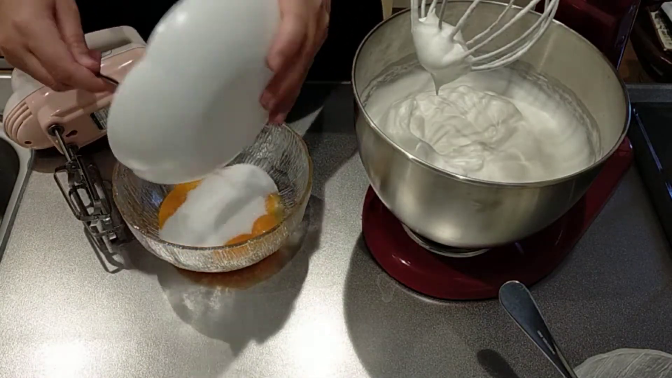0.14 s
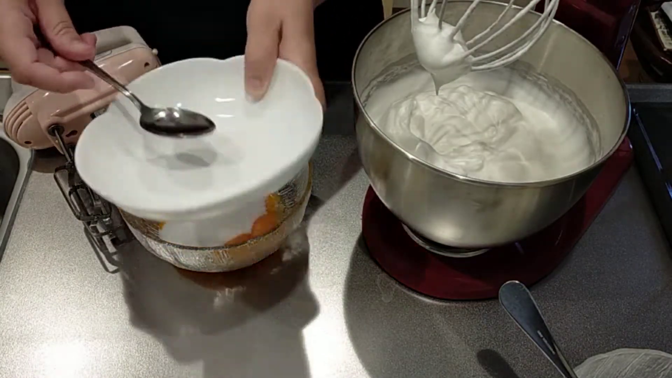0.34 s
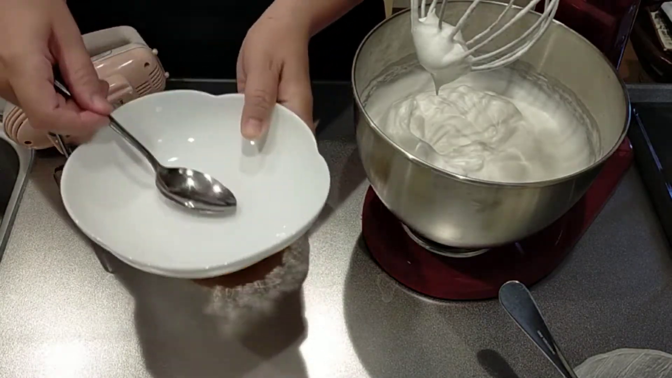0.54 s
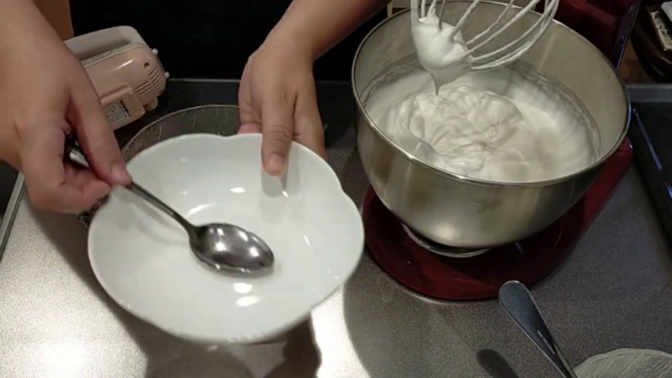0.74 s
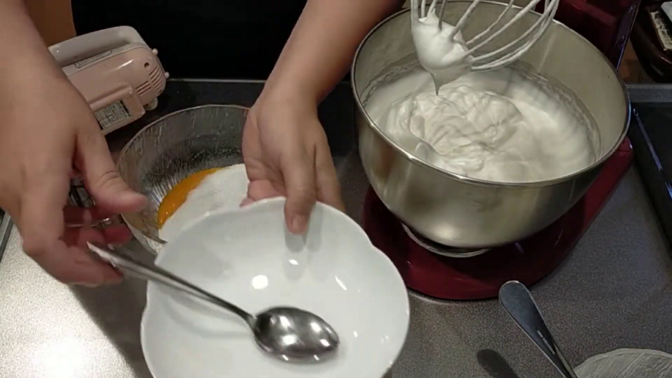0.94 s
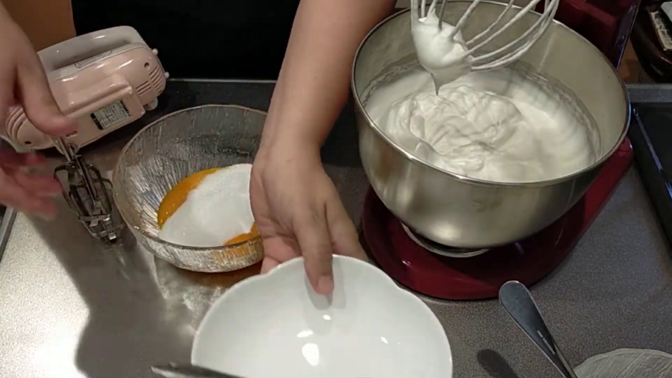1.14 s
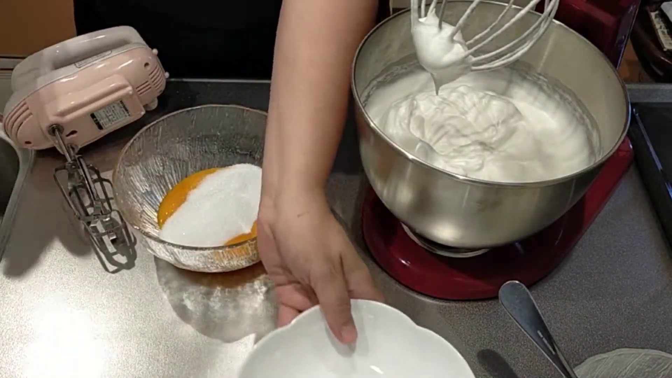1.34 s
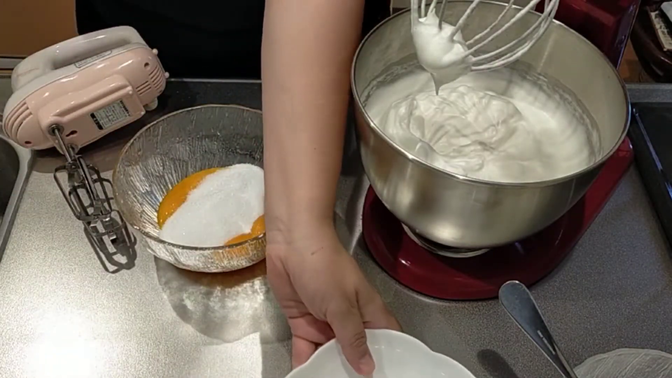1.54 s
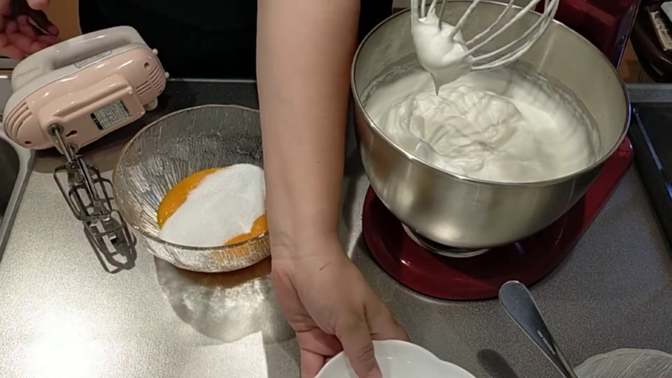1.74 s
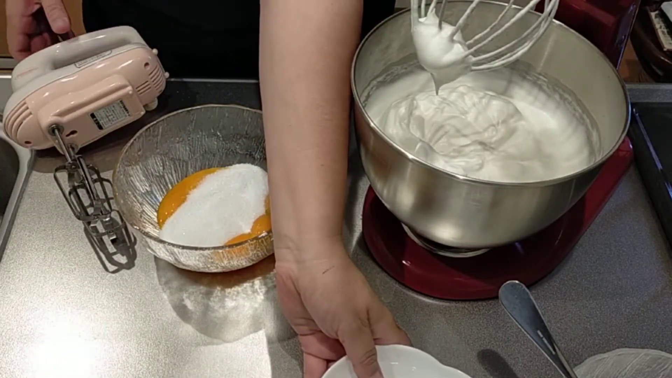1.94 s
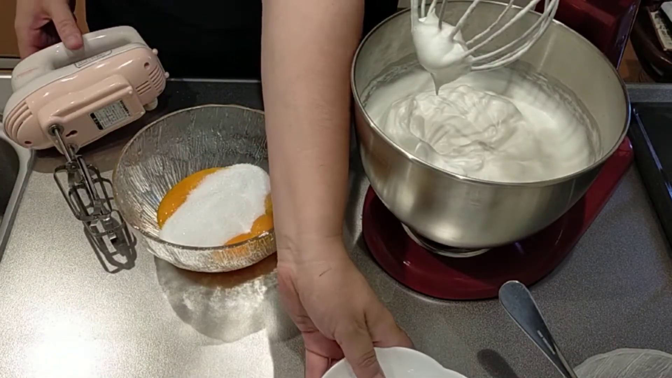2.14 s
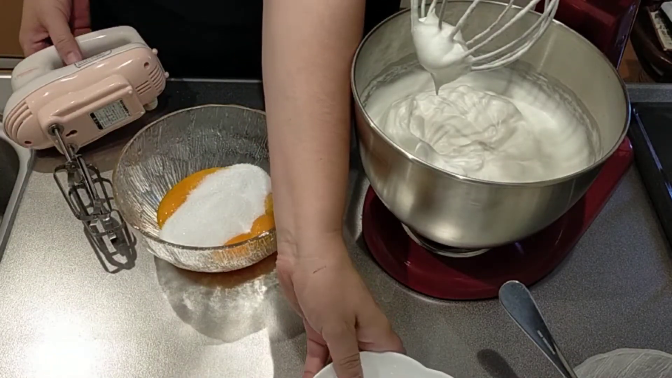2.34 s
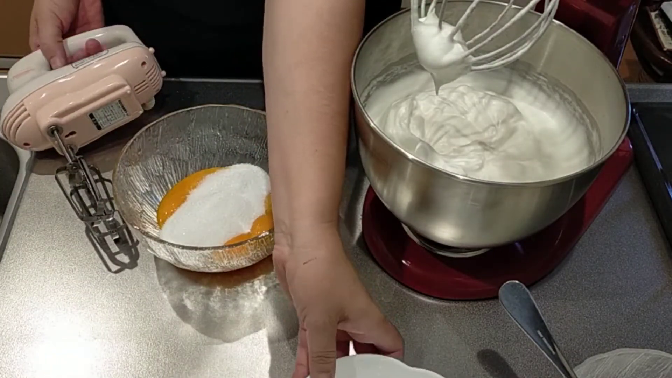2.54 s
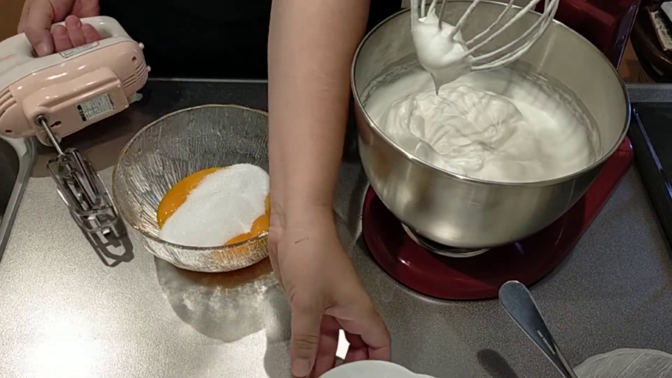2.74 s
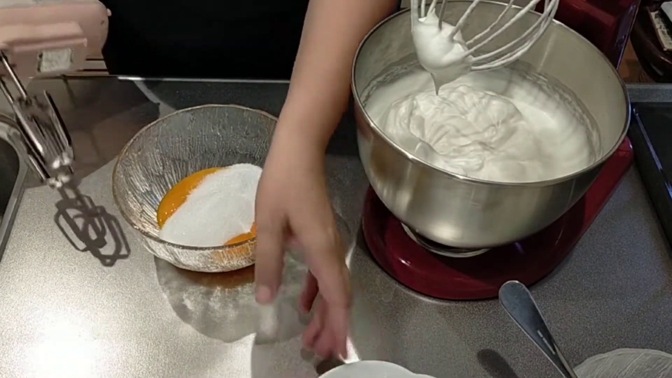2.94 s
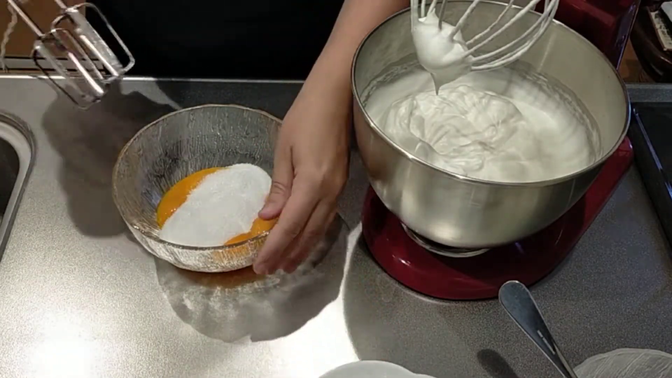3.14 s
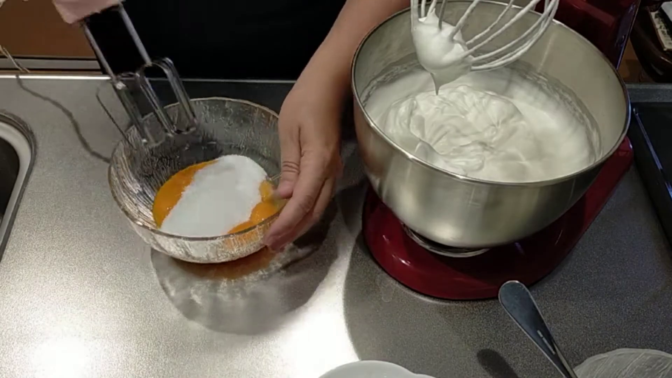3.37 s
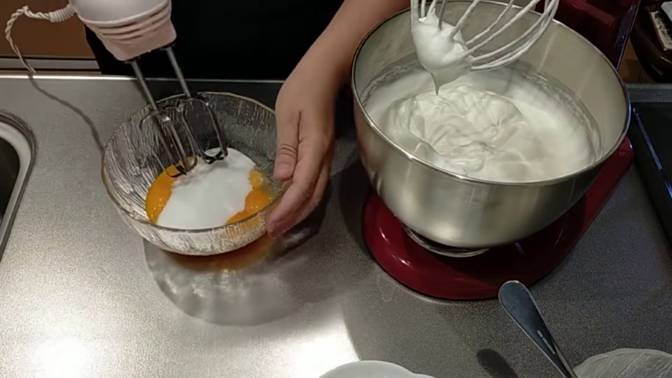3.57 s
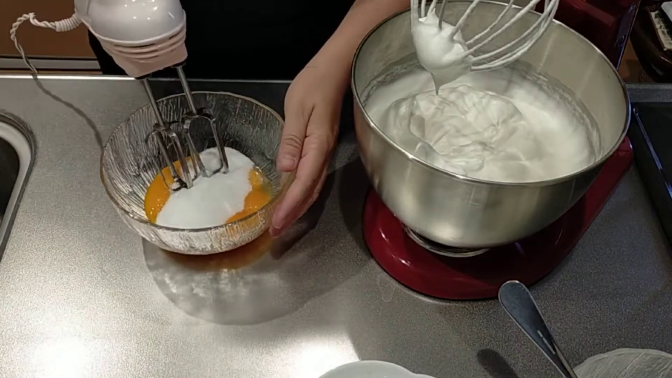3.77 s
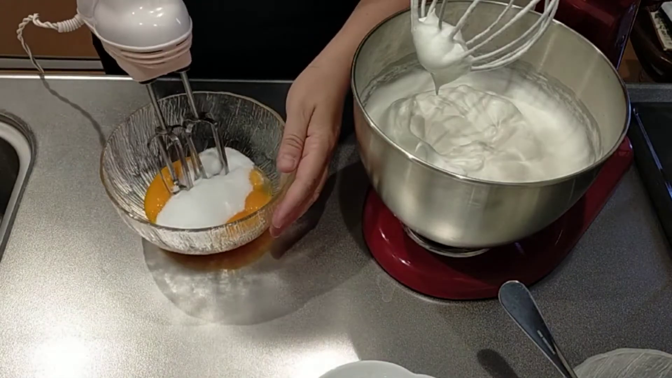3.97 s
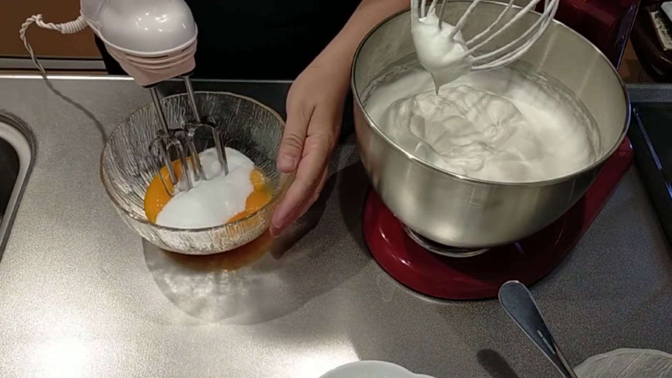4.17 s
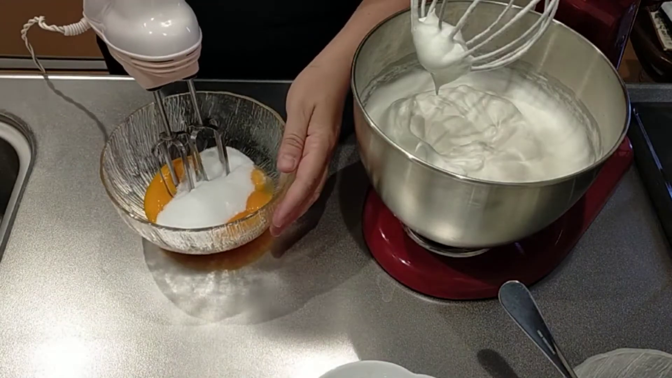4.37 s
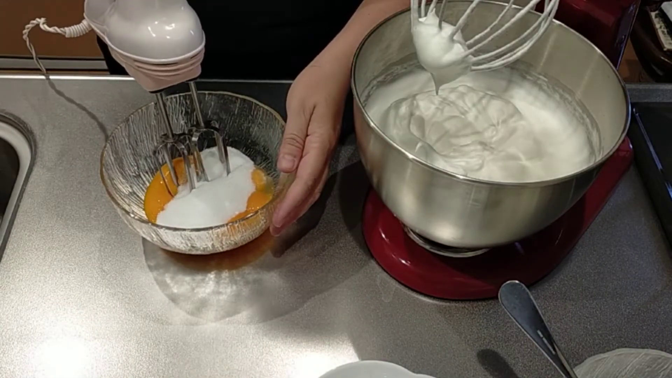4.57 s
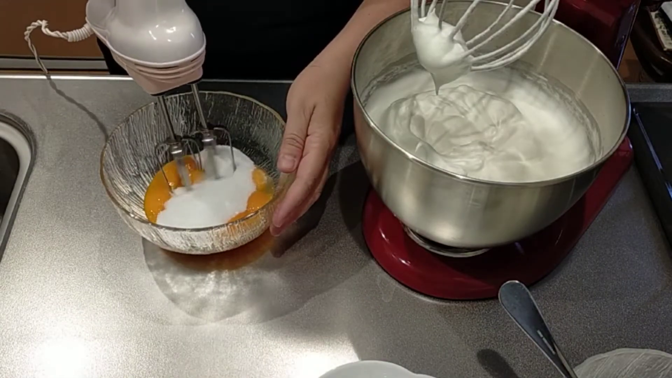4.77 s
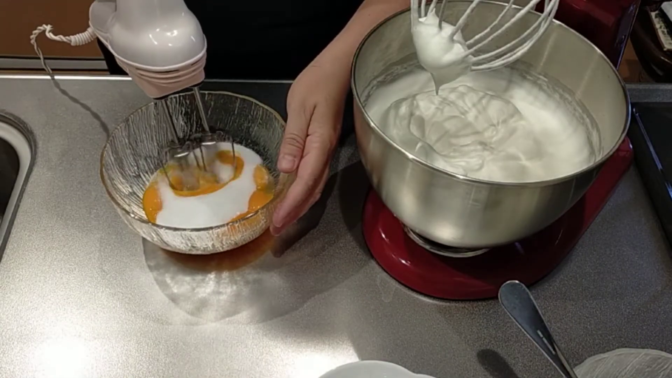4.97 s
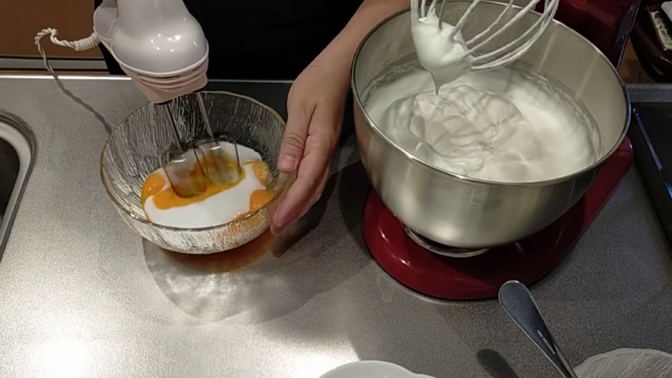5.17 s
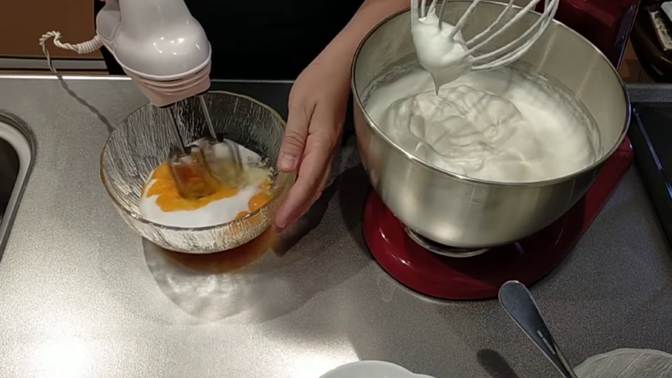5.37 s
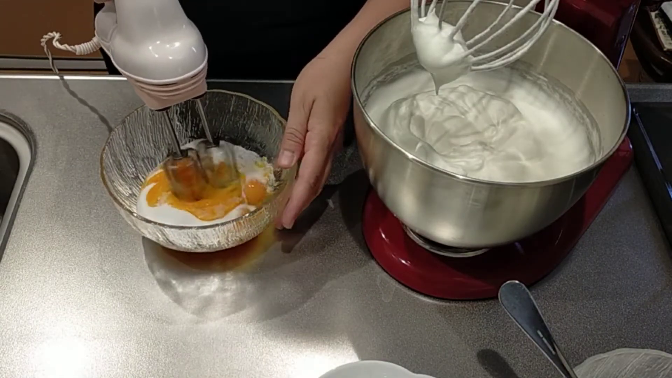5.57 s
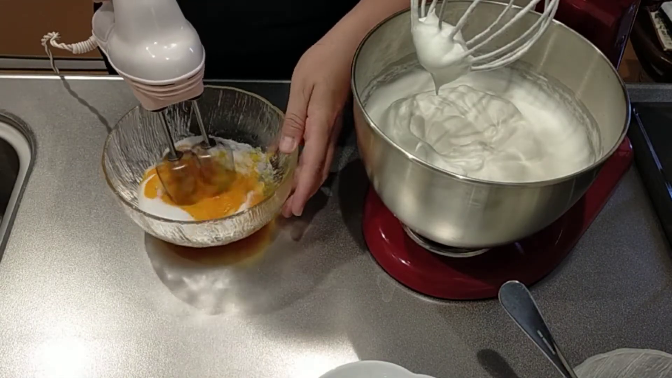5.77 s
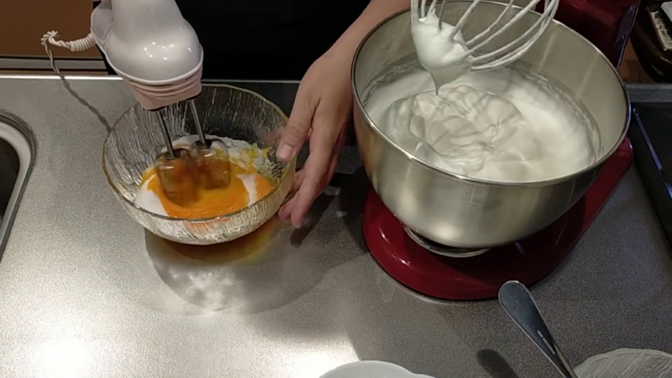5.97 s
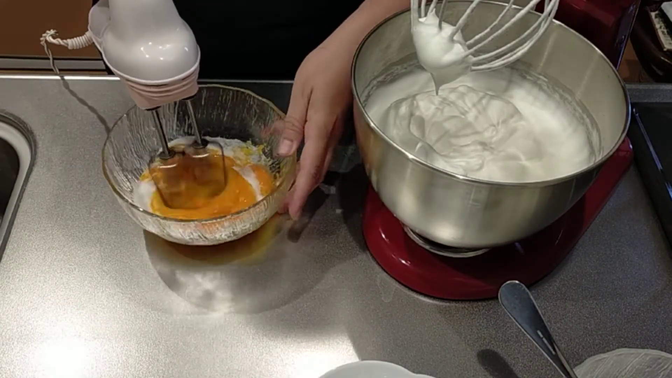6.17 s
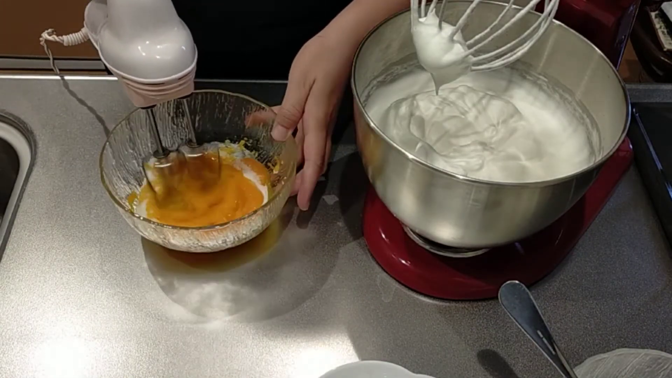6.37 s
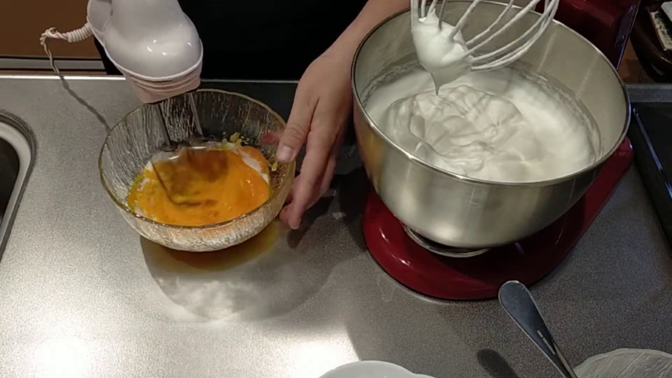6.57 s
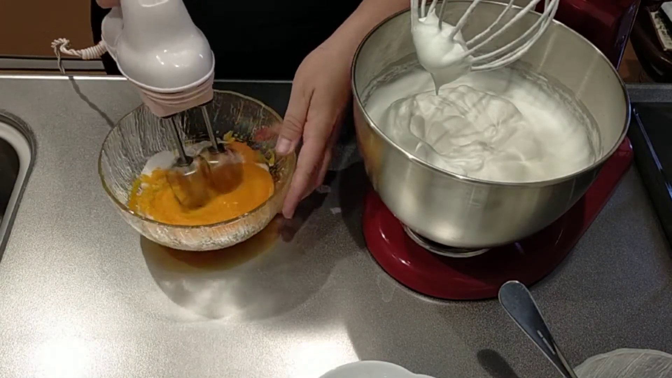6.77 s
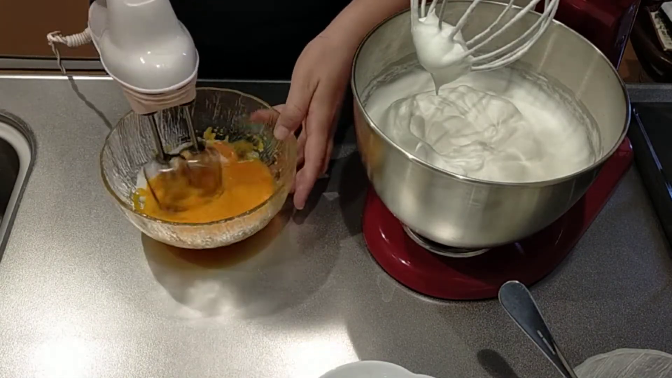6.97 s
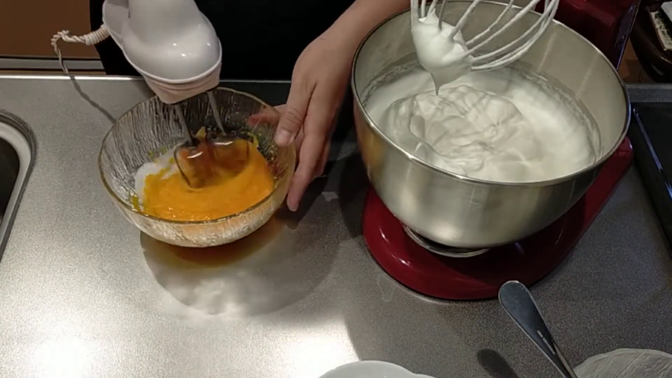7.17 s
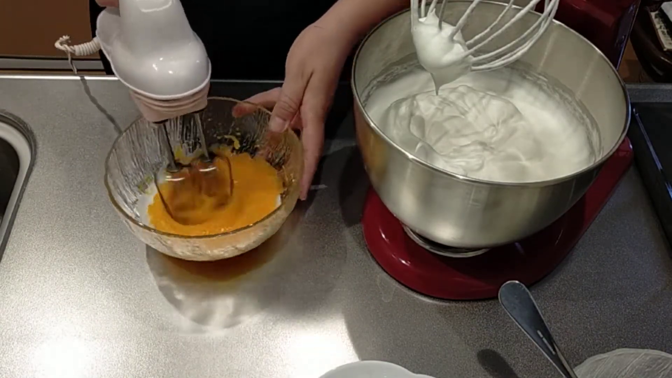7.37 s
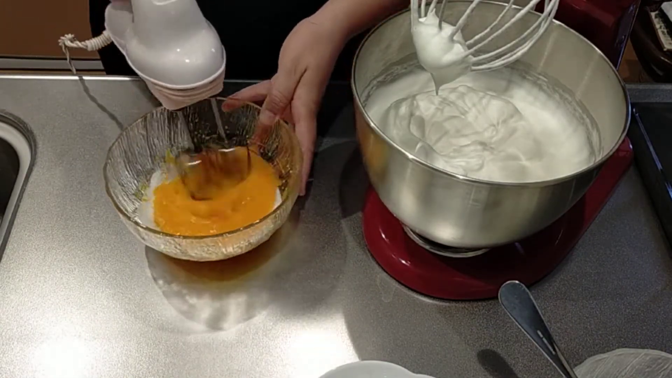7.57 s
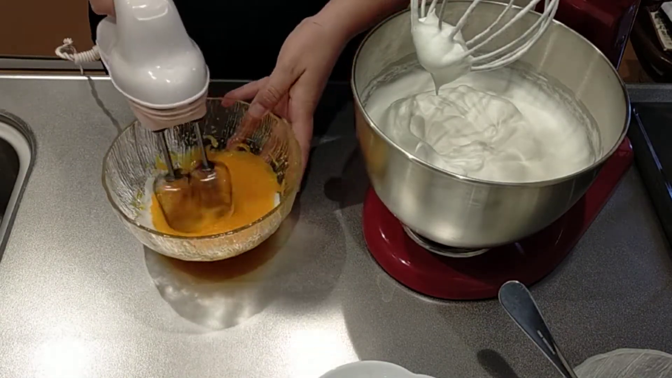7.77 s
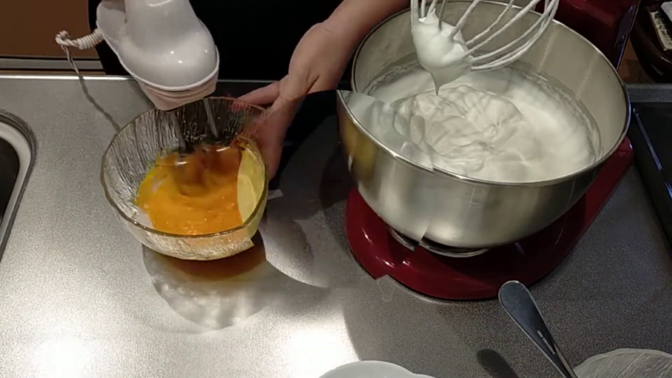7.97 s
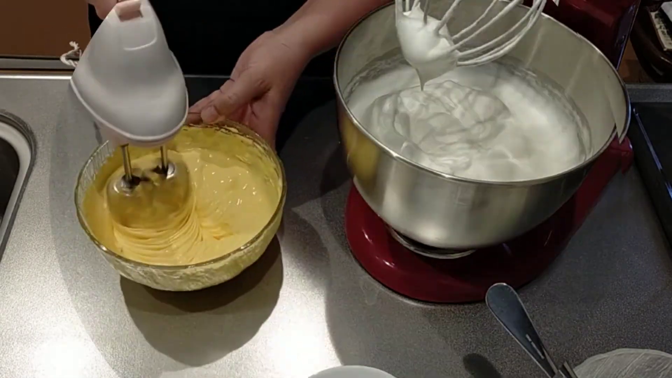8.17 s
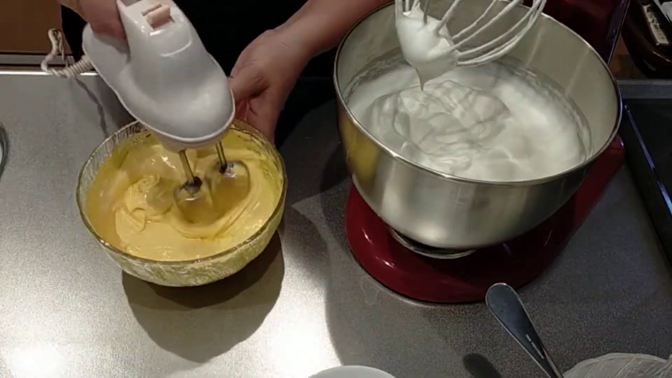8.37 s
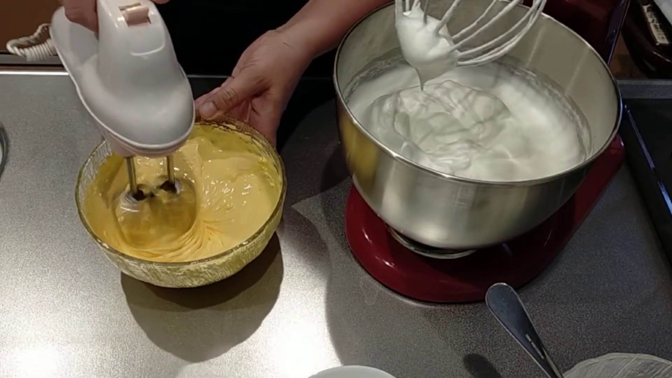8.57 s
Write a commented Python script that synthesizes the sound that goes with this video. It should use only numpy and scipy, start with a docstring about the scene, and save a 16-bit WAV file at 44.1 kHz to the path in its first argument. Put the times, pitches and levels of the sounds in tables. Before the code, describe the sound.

Close and slightly roomy: sparse bright clinks of spoon on china, a dull dish knock on steel, then near quiet with low hum and small handling noises. Halfway through, a hand mixer switches on with a fast rising whine and settles into a harsh, buzzing whir over rapid, low beater slaps. Near the end the motor sounds faster and the beating lighter, with sharp irregular ticks on the glass bowl.

```python
"""Hand mixer in a glass bowl

A spoon clinks in a china dish, the dish is put down on a steel worktop and a hand mixer is picked up.
The mixer's mains motor whines up to speed as rotor tones filtered by the housing, over rasping gears.
Its beaters thud through yolks and sugar: trains of blows that excite the modes of bowl and worktop.
Near the end a crossfade leads to later, thinner batter: the motor runs faster, the wires rattle on the glass.
China, steel and counter ring as sums of decaying modes; rubbing and the low background are coloured noise."""
import sys
import numpy as np
from scipy import signal
from scipy.fft import rfft, irfft, next_fast_len
from scipy.io import wavfile
from scipy.ndimage import map_coordinates

SR = 44100
rng = np.random.default_rng(int(sys.argv[2]) if len(sys.argv) > 2 else 0)


def transcribe(signal):
    """Save signal, clipped to [-1, 1], as a 16-bit WAV file at the path in sys.argv[1]."""
    frames = np.atleast_2d(signal).T
    limited = np.clip(frames, -1, 1)
    pcm = np.round(limited * 32767).astype(np.int16)
    wavfile.write(sys.argv[1], SR, pcm)


N = 380141  # samples in the scene

# rotor tones in thick and in thin batter: rotor_multiple, level_db
THICK_ORDERS = [(6, -54), (9, -54), (10, -51), (11, -53), (13, -55), (21, -57), (24, -51)]
THIN_ORDERS = [(2, -46), (6, -53), (10, -51), (12, -53), (18, -51)]
SLOTS = 12  # in the rotor
THIN_HZ = 319.5  # rotor speed in thin batter
CROSSFADE_S = 7.7  # the crossfade to the later, thinner batter starts
WHINE_FROM_HZ = 65  # rotor speed below which the whine dies away
# the brushes sputter under the starting current
SPUTTER_S, SPUTTER_DB, SPUTTER_FADE_DB_PER_S = 4.758, -41, 23
RATTLE_DB = -6  # shaft rattle relative to the motor's rush


def mixer():
    """Superposition: motor tones, gears, beaters and hard ticks share one place in the stereo image."""
    t = clock()
    thin = np.clip((t - CROSSFADE_S) / .55, 0, 1)  # crossfade from thick (0) to thin (1) batter
    thick_gain, thin_gain = np.sqrt(1 - thin), np.sqrt(thin)
    speed = rotor_speed()
    effort, rush = workload(speed)
    slow = turns(speed, flutter=0.0018)
    fast = turns(THIN_HZ, flutter=0.002)
    # the rotor slots sing loudest as they sweep through the housing's resonances
    inrush = np.minimum(speed / WHINE_FROM_HZ, 1) ** 2
    slots = inrush * housing(SLOTS * speed) * whine(slow, [(SLOTS, 0)], throb=0.7)
    slots = slots * unit(amp(3 * wobble(350)))
    # the other rotor tones only come out near full speed
    hum = (speed / speed.max()) ** 6 * whine(slow, THICK_ORDERS, throb=1.0)
    tones = thick_gain * (slots + hum) + thin_gain * whine(fast, THIN_ORDERS, throb=0.48)
    tones = kitchen(tones, wet_db=-5)
    angle = turns(speed + thin * (THIN_HZ - speed), flutter=.0012)
    # in thin batter the wires reach the glass and sizzle against it
    glass = noise([(5000, -26.0), (9600, 8.0), (11500, -7), (16000, 2.5)])
    sizzle = amp(-10.5) * thin * rush * unit(amp(2.7 * wobble(420)) * glass)
    sputter = amp(SPUTTER_DB) * swell(SPUTTER_S, 0, 240, SPUTTER_FADE_DB_PER_S)
    sputter = (t > ON_S) * sputter * (noise(RUSH) + noise(KNOCK))
    shafts = amp(RATTLE_DB) * (1 - thin / 2) * rattle(angle)
    drive = rush * (amp(-1.5) * gears(angle) + shafts)
    machine = tones + strikes() + sputter + drive + sizzle + effort * beaters(angle, thin)
    return placed(machine, left_db=0.8, lag_samples=-2.45)


# switched on, the motor nears full speed exponentially, then creeps up as the batter loosens
ON_S, SPIN_UP_S, FULL_HZ, CREEP_HZ_PER_S, LIMIT_HZ = 4.69, .24, 244, 11.5, 270.3


def rotor_speed():
    """First-order run-up: rotor turns per second approach full speed exponentially, with a slow creep."""
    run = np.maximum(clock() - ON_S, 0)
    spin_up = FULL_HZ * (1 - np.exp(-run / SPIN_UP_S))
    return np.minimum(spin_up + CREEP_HZ_PER_S * run, LIMIT_HZ)


# the hand pushes the beaters deeper (+) or eases them out (-): middle_s, length_s, beating_db
STROKES = [(6.23, 0.46, 3), (6.71, 0.11, -4.5), (6.967, 0.12, 3), (7.287, 0.099, -7.5), (7.49, 0.19, 3),
           (7.708, 0.22, -7.5), (7.882, 0.12, 3.5)]
# base levels at FULL_HZ, and growth as a power of the speed
BEAT_DB, BEAT_POWER = -35, 0.25
RUSH_DB, RUSH_POWER = -36.5, 3.1
RUSH_FOLLOWS = 0.12  # share of a stroke's dB heard in the motor's rush
ENGAGE_S = 4.84  # the wires reach the batter
LOOSEN_DB_PER_S = 2  # beating eases as the sugar dissolves


def workload(speed):
    """Power-law loading: gains of the beating and of the motor's rush grow with speed and the hand's push."""
    t, pace = clock(), speed / FULL_HZ
    push_db = sum(db * np.exp(-(2 * (t - s) / length) ** 2) for s, length, db in STROKES)
    engaged = swell(ENGAGE_S, np.inf, rise=440, fade=0)
    beat_db = BEAT_DB + push_db - LOOSEN_DB_PER_S * (t - ON_S)
    effort = engaged * pace ** BEAT_POWER * amp(beat_db)
    rush = np.minimum(pace, 1.05) ** RUSH_POWER * amp(RUSH_DB + RUSH_FOLLOWS * push_db)
    return effort, rush


def turns(speed_hz, flutter):
    """Phase integration: rotor angle in turns; the changing load makes the speed flutter."""
    return np.cumsum(speed_hz * (1 + flutter * wobble(30))) / SR


MAINS_HZ = 50
RIPPLE_TURNS = .005  # the mains makes the rotor run unevenly


def whine(angle, orders, throb):
    """Order tones under modulation: each half wave of the mains tugs at their strength and speed."""
    mains = 2 * np.pi * 2 * MAINS_HZ * clock()
    angle = angle + RIPPLE_TURNS * np.sin(mains)
    tones = 0
    for order, db in orders:
        phase = rng.normal(0, .8, (2, 1))  # one for each ear
        tones = tones + amp(db + 2 * wobble(22)) * np.sin(2 * np.pi * order * angle + phase)
    return tones * (1 + throb * np.cos(mains))


# housing resonances that the rotor's whine sweeps through: centre_hz, width_hz, whine_db
HOUSING = [(800, 300, -34), (1690, 280, -32), (2580, 560, -40), (2915, 130, -32.5), (3020, 45, -37.5)]


def housing(hz):
    """Resonance: gain of a rotor tone as it passes the housing's resonances, summed as powers."""
    power = 0
    for centre, width, db in HOUSING:
        power = power + amp(db) ** 2 / (1 + (2 * (hz - centre) / width) ** 2) ** 1.3
    return np.sqrt(power)


# bowl and worktop together: pitch_hz, level_db (relative), t60_s
COUNTER = [(107, -10, .25), (203, -1, .22), (286, 2, .2), (335, -4, .09), (405, -4, .13), (469, -4, .13),
           (570, -3, .05)]
# lead of the wire that hits the sugar heap: time_s, lead_db
HEAP = [(5.5, 9.5), (6.1, 5)]
# spectrum of stirred batter: frequency_hz, density_db (relative, per Hz)
CHURN = [(25, -13), (150, -20.5), (200, -0.5), (570, -4.5), (1100, -25), (3000, -75)]
GEAR_RATIO = 10  # rotor turns per beater turn


def beaters(angle, thin):
    """Impact excitation: four wires slap in turn; the one at the sugar heap leads, by less as time goes on."""
    wire = np.floor(angle * 4 / GEAR_RATIO - .1)
    at = np.flatnonzero(np.diff(wire) > 0)
    size, late = rng.standard_normal((2, len(at)))
    weak = amp(-np.interp(at / SR, *np.transpose(HEAP)))
    share = np.where(wire[at] % 4 == 1, 1, weak) / np.sqrt(1 + 3 * weak ** 2)
    blows = np.zeros(N)
    landing = np.clip(at + (late * .0013 * SR).astype(int), 0, N - 1)
    blows[landing] = share * amp(2 * size)
    # the slaps carry little deep bass, and thin batter gives lighter slaps
    slaps = driven(blows, COUNTER, spread=2.2)
    slaps = unit(filtered(slaps, lambda hz: 1j * hz / (1j * hz + 130)))
    light = unit(filtered(slaps, lambda hz: (1j * hz / (1j * hz + 316)) ** 2))
    slaps = np.sqrt(1 - thin) * slaps + np.sqrt(thin) * light
    # each slap drags a short squelch of sugar after it
    drag = unit(signal.fftconvolve(blows, amp(-60 * clock(SR // 8) / 0.091))[:N])
    squelch = drag * (amp(-4.0) * noise(CHURN) + amp(-4.5) * noise(RUSH))
    return amp(-4.0) * slaps + squelch


# spectrum of gears and brushes: frequency_hz, density_db (relative, per Hz)
RUSH = [(200, -7), (700, -4), (1120, -13.5), (1600, -5), (2200, -5), (2900, -4), (3800, -10.5),
        (5000, -6.5), (6300, -7), (7300, -18.5), (11000, -30.5), (14000, -20.5), (16000, -51)]


def gears(angle):
    """Periodic roughness: unevenly worn teeth repeat a rasp each wheel turn; brushes add a sputtering hiss."""
    wheel = angle / GEAR_RATIO % 1
    patches = np.repeat(rng.standard_normal(60), 20)
    wear = rng.standard_normal((2, 1200)) * amp(4 * patches)
    teeth = np.array([np.interp(wheel, np.linspace(0, 1, len(w)), w) for w in wear])
    rasp = unit(filtered(teeth + .5 * teeth[::-1], lambda hz: amp(along(RUSH, hz))))
    sputter = unit(amp(2 * wobble(500) + 5 * wobble(25)))
    return .7 * rasp * amp(2 * wobble(20)) + .6 * sputter * noise(RUSH)


# shaft sockets: pitch_hz, level_db (relative), t60_s
SOCKETS = [(1590, -19.5, .035), (2910, 1, 0.0048), (5290, -3.5, 0.0072)]
RATTLE_SCATTER_DB = 4


def rattle(angle):
    """Jittered impacts: beater shafts knock in their sockets twice a rotor turn, uneven in time and strength."""
    at = np.flatnonzero(np.diff(np.floor(2 * angle)) > 0)
    size, late = rng.standard_normal((2, len(at)))
    knocks = np.zeros(N)
    landing = np.clip(at + (late * .002 * SR).astype(int), 0, N - 1)
    knocks[landing] = amp(RATTLE_SCATTER_DB * np.minimum(size, 2))
    return driven(knocks, SOCKETS, spread=2.05)


# switch, and beater wires on glass: start_s, thud_db, wire_db (relative)
TICKS = [(4.692, -42, -38.5), (5.0495, -29, -31), (5.099, -33, -30.5), (5.571, -21, -44),
         (8.271, -23.5, -22.5), (8.3293, -20.5, -26.5), (8.439, -19, -28), (8.455, -21, -23),
         (8.477, -20, -23), (8.4906, -15, -18), (8.578, -22.5, -21.5), (8.5944, -19, -23.5)]
# the struck glass bowl: pitch_hz, level_db (relative), t60_s
BOWL = [(406, 0.5, 0.1)]
# spectra of a hard crack and a dull knock: frequency_hz, density_db (relative, per Hz)
CRACK = [(200, -32), (780, -4), (1800, -14), (2650, -3.5), (3800, -9), (4700, 0), (6000, -6), (6900, -17.5),
         (14500, -18)]
KNOCK = [(100, -16), (400, 5.5), (770, 7.5), (1100, 0.5), (2700, -2), (6000, -74)]
THICK_WIRE_HZ, THIN_WIRE_HZ = 5330, 5730  # the wires ring higher in thin batter


def strikes():
    """Impulse response: a hard contact thuds in the bowl and rings the wires, higher from the crossfade on."""
    out = np.zeros((2, N))
    for s, thud_db, wire_db in TICKS:
        thud = amp(-6) * burst(KNOCK, t60=0.063, attack=0.00054) + amp(-6.5) * ring(BOWL, spread=0.4)
        wire_hz = THICK_WIRE_HZ if s < CROSSFADE_S else THIN_WIRE_HZ
        wire = amp(-5.5) * burst(CRACK, t60=0.14, attack=0.00013)
        wire = wire + amp(-1) * ring([(wire_hz, 0, .05)], spread=1)
        add(out, s, amp(thud_db) * thud + amp(wire_db) * wire)
    return out


# spoon on dish: start_s, level_db, china_db, steel_db (all relative)
CLINKS = [(0.557, -22, 4, -26), (0.717, -17, -13.5, 1.5), (0.7321, -15.5, -7.5, -4),
          (0.7631, -22, -1.5, 0.5), (1.0497, -18.5, -2, -10.5), (1.166, -23, -18, -3.5),
          (1.178, -23.5, -6, -6), (1.195, -19.5, -17, -2.5), (1.5037, -36.5, -17, -23)]
# dish on worktop: start_s, level_db, china_db, steel_db (all relative)
KNOCKS = [(1.959, -22.5, -17, -28), (1.972, -33, -2.5, -30), (1.994, -26, -7.5, -22),
          (2.012, -34.5, -15, -5), (2.642, -26, -3.5, -1), (2.76, -39, -9.5, -14)]
# spoon sliding on china: start_s, level_db, fade_db_per_s
SLIDES = [(0.738, -35, 59.5), (0.957, -46, 46), (1.195, -34, 99)]
SLIDE_RISE_DB_PER_S = 898.5
SLIDE_END_S, SLIDE_END_DB_PER_S = 1.18, 249.5  # the sliding dies away
# ringing china and steel: pitch_hz, level_db (relative), t60_s (before grip)
CHINA = [(790, -17, .12), (2540, -8, .15), (2625, -2, .22), (2890, -10, .18), (4613, 0, .25),
         (4915, -9, .15)]
STEEL = [(hz, db, .3) for hz, db in [(4510, -11), (5626, -5), (5782, -10), (5862, -4), (5935, -1),
         (5995, -6), (7350, -14), (7770, -14), (9415, -16), (12070, -15), (13450, -15), (14450, -15)]]
# the dish standing on the worktop, low and high modes: pitch_hz, level_db (relative), t60_s
DISH_FOOT = [(433, -1, .13), (792, -1.5, 0.1), (1346, -5, 0.058)]
DISH_RIM = [(hz, db, .14) for hz, db in [(2713, 1), (2915, -6), (4755, -3), (5290, -7), (5960, -5)]]
# the spoon's loosely held handle sings on after it lands: pitch_hz, level_db, t60_s
HANDLE = [(1707, -45, .25), (3575, -35, .55)]
HANDLE_S = .76


def tableware():
    """Modal vibration: contacts ring dish and spoon; a dish put down also knocks the worktop, which damps it."""
    out = np.zeros((2, N))
    for s, db, china_db, steel_db in CLINKS:
        china = amp(china_db - 2.0) * ring(CHINA, spread=3.5, grip=2.06)
        steel = amp(-6.5) * ring(STEEL, spread=1.08, grip=1.2) + amp(-14) * jangle(t60=.22)
        crack = amp(-13.0) * burst(CRACK, t60=0.081, attack=0.00024)
        add(out, s, amp(db) * (china + amp(steel_db) * steel + crack))
    add(out, HANDLE_S, ring(HANDLE, spread=0))
    for s, db, china_db, steel_db in KNOCKS:
        china = amp(china_db - 4) * ring(DISH_RIM, spread=1.2) + amp(-9) * ring(DISH_FOOT, spread=1)
        steel = amp(steel_db - 10) * ring(STEEL, spread=1.3, grip=2)
        chatter = amp(china_db - 5) * burst(CRACK, t60=0.23, attack=0.0013)
        thud = amp(-3.0) * burst(KNOCK, t60=0.085, attack=0.00079)
        add(out, s, amp(db) * (china + steel + chatter + thud))
    # the sliding spoon catches and slips on the glaze
    slips = rng.standard_normal(N) * amp(5.6 * np.minimum(wobble(160), 1))
    scrape = driven(slips, CHINA + STEEL + DISH_RIM, spread=2, grip=2)
    scrape = scrape + amp(-3) * unit(noise(CRACK) * amp(2 * wobble(120)))
    scrape = scrape * swell(0, SLIDE_END_S, rise=0, fade=SLIDE_END_DB_PER_S)
    out += scrape * sum(amp(db) * swell(s, 0, SLIDE_RISE_DB_PER_S, fade) for s, db, fade in SLIDES)
    return kitchen(out, wet_db=-7.0)


def jangle(t60):
    """Damped contact noise: steel buzzes on the glaze in a dying run of tiny contacts, each choked at once."""
    contacts = driven(rng.standard_normal(SR), STEEL, spread=1.533, grip=8.7)[:, :SR]
    return contacts * amp(-60 * clock(SR) / t60)


# hands move the dish, the mixer with its cord, and the bowl:
# start_s, length_s, shuffle_db, rustle_db (relative)
MOVES = [(2.163, 0.033, -62, -63.5), (2.988, 0.018, -60.5, -51.5), (3.088, 0.23, -60, -59),
         (3.358, 0.065, -46, -63), (3.526, 0.016, -48, -63.5), (3.877, 0.015, -75.5, -63.5)]
MOVE_RISE_DB_PER_S, MOVE_FADE_DB_PER_S = 238, 118
# the mixer's plastic body catches as it is lifted: start_s, level_db
CATCHES = [(2.976, -45.5)]
# soft bumps against the counter: start_s, level_db (relative)
BUMPS = [(2.417, -44), (2.936, -50), (3.512, -43.5), (4.11, -40)]
# spectra of a soft bump and of rustling: frequency_hz, density_db (relative, per Hz)
BUMP = [(22, -4), (90, 6.5), (150, -11.5), (900, -56)]
RUSTLE = [(250, -11), (700, -4.5), (1900, -2.5), (3200, -10), (5500, -11.5), (8000, -31)]
BOWL_DB = -4  # ring of bowl and worktop under the shuffling
SKID_S, SKID_DB, SKID_HZ = 2.16, -53.5, 397  # the dish's foot hums as it skids on the steel


def handling():
    """Friction noise: hands bump the counter, skid the dish, lift the mixer with its cord and shift the bowl."""
    shuffle, rustle = 0, 0
    for s, length, shuffle_db, rustle_db in MOVES:
        move = swell(s, length, MOVE_RISE_DB_PER_S, MOVE_FADE_DB_PER_S)
        shuffle = shuffle + amp(shuffle_db) * move
        rustle = rustle + amp(rustle_db) * move
    rub = noise(CHURN) / 2 + amp(BOWL_DB) * driven(rng.standard_normal(N), COUNTER, spread=2.3)
    out = shuffle * rub * amp(1.1 * wobble(45)) + rustle * noise(RUSTLE) * amp(2.0 * wobble(60))
    skid = amp(SKID_DB) * swell(SKID_S, 0, MOVE_RISE_DB_PER_S, 63)
    out += skid * driven(rng.standard_normal(N), [(SKID_HZ, 0, .12)], spread=0.91)
    for s, db in CATCHES:
        add(out, s, amp(db) * burst(RUSTLE, t60=0.13, attack=0.00098))
    for s, db in BUMPS:
        add(out, s, amp(db + 4.5) * burst(BUMP, t60=0.41, attack=0.0048))
    return out


# background spectrum: frequency_hz, density_db (relative, per Hz)
FLOOR = [(35, -14), (66, -7.5), (125, -21), (520, -25), (1100, -34.5), (16000, -49)]
FLOOR_DB = -62.5


def background():
    """Stationary noise: the kitchen's low hum as steady noise weighted to the bass."""
    return amp(FLOOR_DB) * noise(FLOOR)


# the small room's decay: frequency_hz, t60_s
KITCHEN = [(150, 0.76), (1000, 0.3), (5000, 0.27), (14000, 0.056)]


def kitchen(x, wet_db):
    """Reverberation: add the small room's decaying answer, different in each ear and weak in the bass."""
    hz, t, grid = signal.stft(rng.standard_normal((2, SR // 2)), SR, nperseg=256)
    decay = amp(-60 * t / along(KITCHEN, hz)[:, None])
    bass_cut = (hz / (hz + 200))[:, None]
    tail = signal.istft(grid * decay * bass_cut, SR, nperseg=256)[1]
    tail = tail / np.linalg.norm(tail[0])
    return x + amp(wet_db) * signal.fftconvolve(x, tail, axes=1)[:, :N]


def placed(x, left_db, lag_samples):
    """Interaural cues: a level and an arrival difference between the two ears."""
    sides = np.array([[.5], [-.5]])
    return amp(left_db * sides) * filtered(x, lambda hz: np.exp(-2j * np.pi * hz * sides * lag_samples / SR))


def ring(modes, spread, grip=1):
    """Modal decay: struck modes vary at each touch, grip damps them, higher ones differ more between the ears."""
    t, out = clock(SR), 0
    for hz, db, t60 in modes:
        gain, phase = rng.standard_normal((2, 2, 1))
        detune, touch = rng.standard_normal(2)
        apart = hz / (hz + 1000) * hz ** 2 / (hz ** 2 + 200 ** 2)
        strength = amp(db + 2 * touch + 2 * apart * gain)
        pitch = hz * (1 + .003 * detune)
        decay = amp(-60 * t * grip / t60)
        out = out + strength * decay * np.sin(2 * np.pi * pitch * t + phase * spread * apart)
    return out


def driven(force, modes, spread, grip=1):
    """Forced vibration: modes kept ringing by a force (convolution), at rms 1."""
    return unit(signal.fftconvolve(force[None], ring(modes, spread, grip), axes=1)[:, :N])


def burst(spectrum, t60, attack):
    """Dense modal overlap: a dying puff of coloured noise stands for closely packed resonances."""
    t = clock(SR)
    return noise(spectrum, size=SR) * amp(-60 * t / t60) * (1 - np.exp(-t / attack))


# likeness of the two ears' noise: frequency_hz, correlation
ALIKE = [(120, 0.93), (280, 0.91), (1000, 0.21), (8000, 0.11)]


def noise(spectrum, size=N):
    """Partial coherence: coloured stereo noise of rms 1, nearly mono in the bass."""
    def mid_side(hz):
        turn = np.arccos(np.clip(along(ALIKE, hz), -1, 1)) / 2
        return amp(along(spectrum, hz)) * [np.cos(turn), np.sin(turn)]

    mid, side = filtered(rng.standard_normal((2, size)), mid_side)
    return unit(np.array([mid + side, mid - side]))


def swell(start, hold, rise, fade):
    """Exponential envelope: gain rises to 1 at start, holds and fades; slopes in dB per second."""
    t = clock()
    before, after = np.maximum(start - t, 0), np.maximum(t - start - hold, 0)
    return amp(-abs(rise) * before - abs(fade) * after)


def wobble(rate):
    """Band-limited fluctuation: a smooth random curve, rate knots a second."""
    return map_coordinates(rng.standard_normal(int(N * rate / SR) + 4), [clock() * rate])


def filtered(x, response):
    """Linear filtering: the spectrum of x times a complex response of frequency."""
    n = x.shape[-1]
    m = next_fast_len(n + 8192)
    return irfft(rfft(x, m) * response(np.fft.rfftfreq(m, 1 / SR)), m)[..., :n]


def add(track, s, sound):
    """Superposition: mix a sound into the track at time s."""
    part = track[:, round(s * SR):][:, :sound.shape[-1]]
    part += sound[:, :part.shape[-1]]


def along(points, hz):
    """Logarithmic frequency scale: interpolate (frequency_hz, value) points."""
    f, v = np.transpose(points)
    return np.interp(np.log(hz + 1), np.log(f + 1), v)


def amp(db):
    """Level law: decibels to amplitude gain."""
    return 10 ** (np.asarray(db) / 20)


def unit(x):
    """Normalization: scale to rms 1."""
    return x / np.sqrt(np.mean(x ** 2) + 1e-20)


def clock(size=N):
    """Uniform sampling: sample times in seconds."""
    return np.arange(size) / SR


def scene():
    """Superposition: everything on the worktop, over the kitchen's low hum."""
    return mixer() + tableware() + handling() + background()


TOP_HZ = 15900


def record(dry):
    """Band limiting: a steep low-pass leaves almost nothing above the top frequency."""
    return filtered(dry, lambda hz: 1 / (1 + (hz / TOP_HZ) ** 120))


dry = scene()
out = record(dry)
transcribe(out)
```